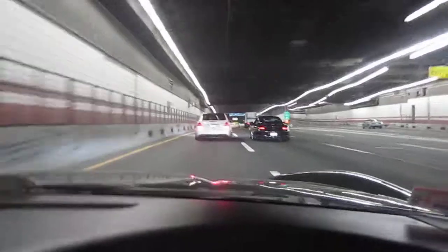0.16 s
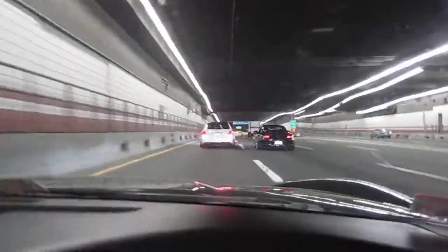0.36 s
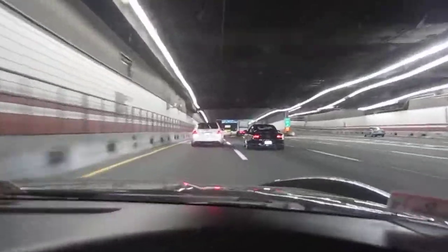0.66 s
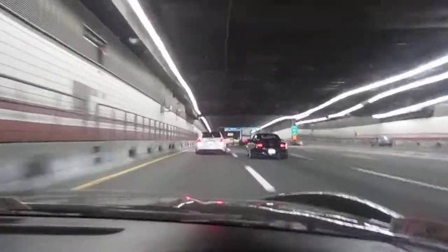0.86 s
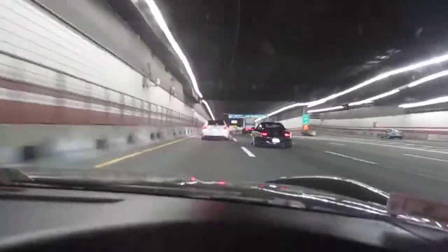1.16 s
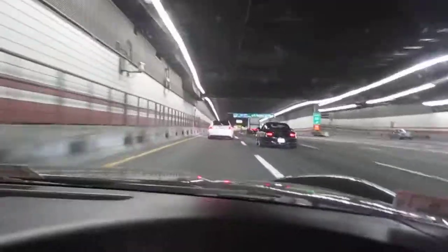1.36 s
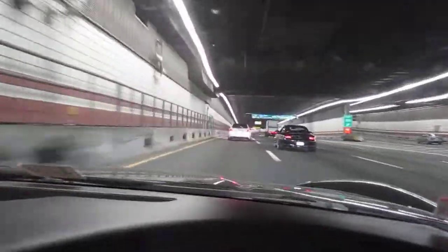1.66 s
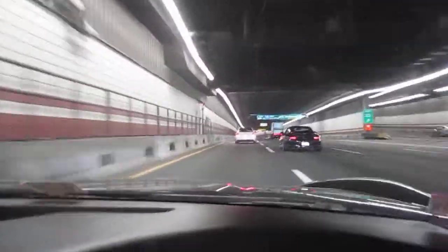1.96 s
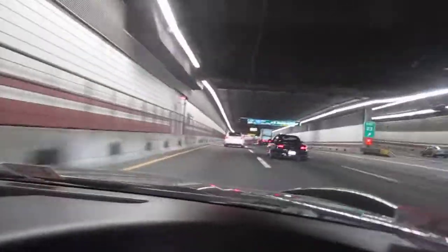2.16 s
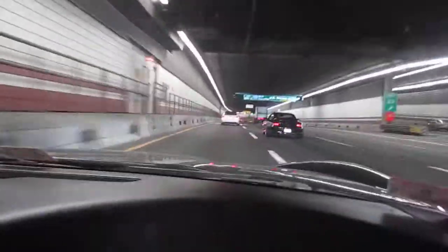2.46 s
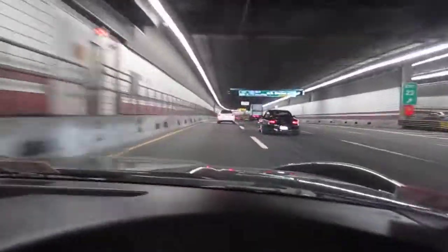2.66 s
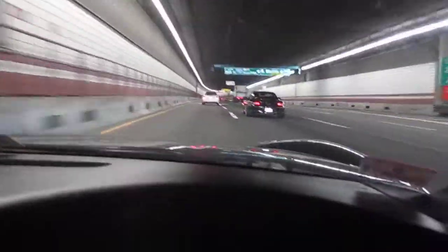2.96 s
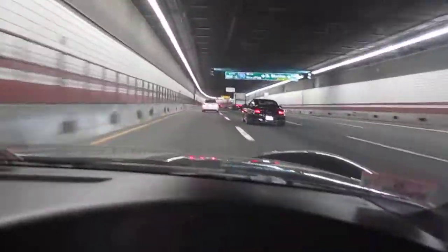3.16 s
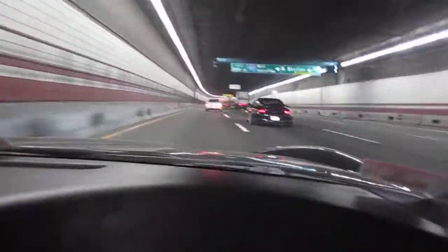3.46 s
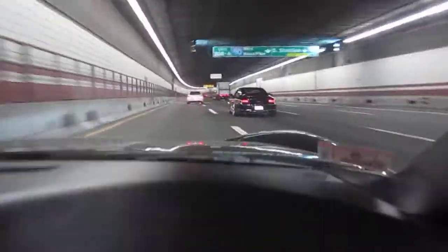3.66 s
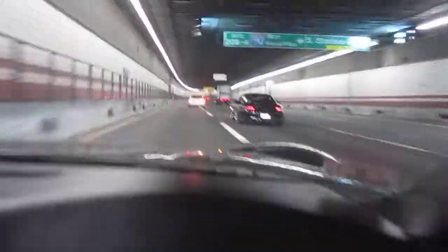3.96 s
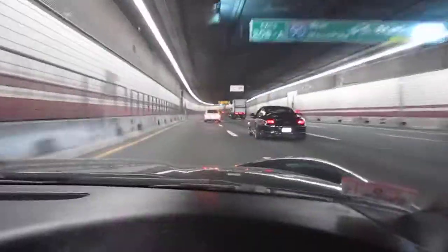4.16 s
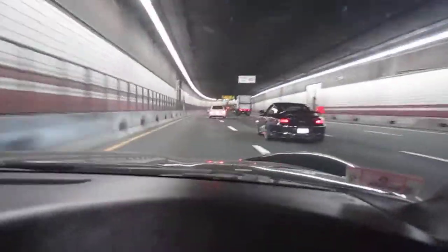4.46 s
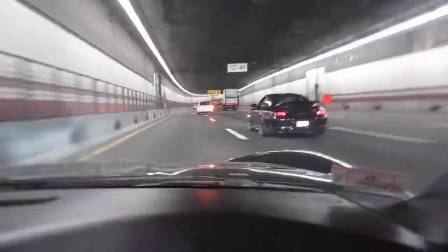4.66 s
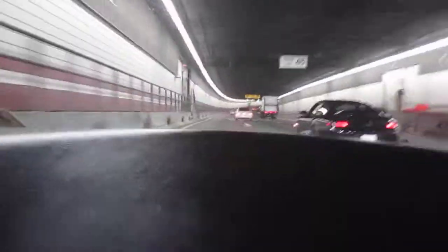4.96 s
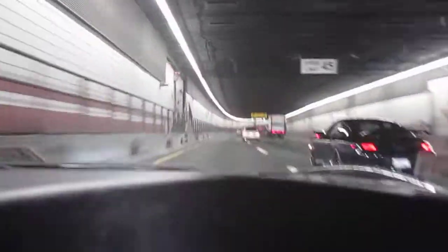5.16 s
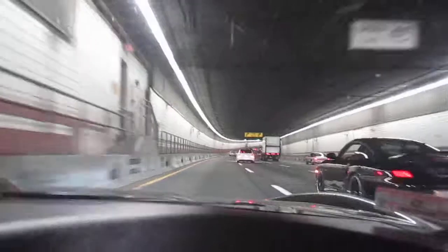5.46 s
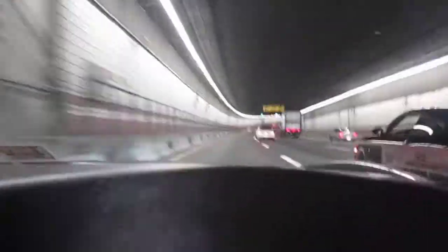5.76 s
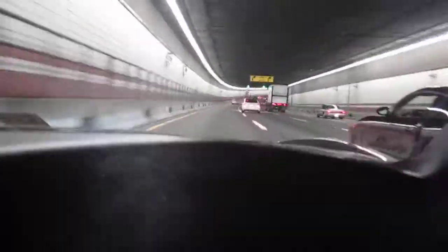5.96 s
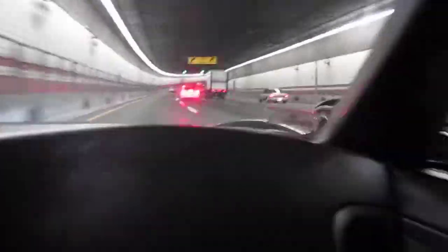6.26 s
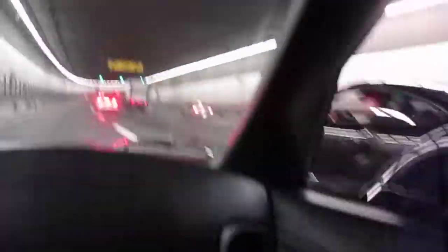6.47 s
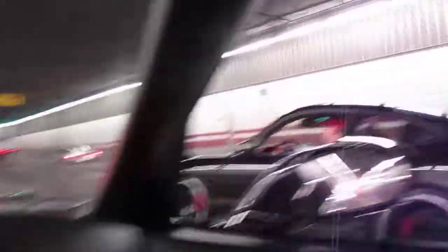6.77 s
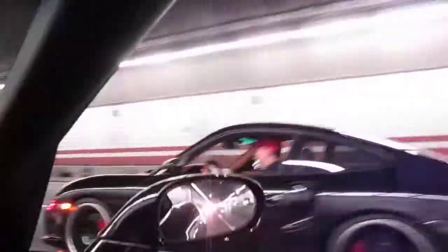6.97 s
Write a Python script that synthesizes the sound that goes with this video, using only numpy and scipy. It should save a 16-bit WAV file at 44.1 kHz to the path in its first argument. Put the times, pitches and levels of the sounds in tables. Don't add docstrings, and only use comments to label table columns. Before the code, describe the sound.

Eight-cylinder growl climbs over roaring tunnel air and tyre hiss, eases into buffeting, then a closing window leaves a dull, ticking cabin.

```python
import sys
import numpy as np
from scipy import signal
from scipy.io import wavfile
from scipy.ndimage import uniform_filter1d

SR = 44100
rng = np.random.default_rng(int(sys.argv[2]) if len(sys.argv) > 2 else 0)


def dump(signal):
    limited = np.clip(np.atleast_2d(signal).T, -1, 1)
    pcm = np.round(limited * 32767).astype(np.int16)
    wavfile.write(sys.argv[1], SR, pcm)


def field_ratio(decibels):
    return 10 ** (np.asarray(decibels, dtype=float) / 20)


N = 313985
SHUT_S, SEAL_S = 6.2, 0.00399

# start_s, cycle_hz
ENGINE_SPEED = [(0.0, 28.71), (1.25, 28.29), (1.5, 28.85), (1.9, 29.26), (2.14, 30.15), (2.7, 32.57),
                (3.0, 33.73), (3.84, 37.74), (4.13, 39.05), (4.56, 40.9), (4.9, 40.09), (5.5, 39.7),
                (6.3, 38.6), (7.12, 38.7)]
# start_s, level_db
FIRING_LEVEL = [(0, -36), (.6, -34.5), (1.15, -29), (2.0, -29.5), (2.6, -27.5), (3.7, -32), (4.0, -35.5),
                (6.2, -47), (6.4, -61), (7.12, -56)]
# multiple, pulling_db, cruising_db, coasting_db
LOUD_ORDERS = [
    (4, -24.5, -42.5, -32),
    (5, -31, -40, -44.5),
    (6, -36.5, -32.5, -43.5),
]
# multiple, full_load_db
LOAD_ORDERS = [(2, -33), (3, -37), (7, -38), (9, -46.5), (10, -40.5), (11, -42), (12, -47.5), (13, -43),
               (14, -42), (20, -45), (21, -45), (22, -59), (24, -48.5)]
# pitch_hz, width_hz, lift_db
BOOM_RINGS = [
    (142.7, 9.6, 6),
    (164.7, 7.4, -8.5),
    (196.7, 6.5, 12.5),
    (235.8, 11, 7.5),
]
# pitch_hz, width_hz, lift_db
PANEL_RINGS = [(61.2, 7.7, 4), (219, 23, 12), (352, 17, 8), (388, 16.5, 9), (810, 78, 6.5)]
PULL_S, PULL_RISE_S, LIFT_S, LIFT_FALL_S = 1.97, 0.28, 4.45, 0.21
CRUISE_LOAD_DB, COAST_LOAD_DB, PULL_SWELL_DB_PER_S, GLASS_LOSS_DB = -14.5, -21.5, 2.5, 5
WALL_BLUR_DB = 0.1116


def engine():
    hz, = in_time(ENGINE_SPEED)
    phase = 2 * np.pi * np.cumsum(hz * (1 + 0.0021 * drift(6.6))) / SR
    pulled, lifted = ramp(PULL_S, PULL_RISE_S), ramp(LIFT_S, LIFT_FALL_S)
    pulling = pulled * (1 - lifted)
    swell_db = pulling * PULL_SWELL_DB_PER_S * (np.arange(N) / SR - 3.4)
    common_db = swell_db - GLASS_LOSS_DB * ramp(SHUT_S, 0.18)
    firing_db, = in_time(FIRING_LEVEL)
    out = tone(8 * phase, firing_db + lift(BOOM_RINGS, 8 * hz), flutter_db=1.5)
    for k, pull_db, cruise_db, coast_db in LOUD_ORDERS:
        db = pulling * pull_db + (1 - pulled) * cruise_db + lifted * coast_db
        wander_db = (0.8 + 2.2 * (1 - pulling)) * drift(4.7)
        db = db + lift(BOOM_RINGS, k * hz) + common_db + wander_db
        out += tone(k * phase, db, flutter_db=1.5)
    load_db = (1 - pulled) * CRUISE_LOAD_DB + lifted * COAST_LOAD_DB + common_db
    for k, full_db in LOAD_ORDERS:
        blur_db = WALL_BLUR_DB * k * drift(5.7)
        db = full_db + load_db + blur_db + lift(PANEL_RINGS, k * hz)
        out += tone(k * phase, db, flutter_db=2.0)
    return out


# start_s, end_s, pitch_hz, glide_hz_per_s, level_db, swell_db_per_s
FAR_EXHAUSTS = [
    (0, 1.1, 135, 4.5, -28.5, 3),
    (1.45, 2.0, 144, 5.5, -33.5, 6.5),
    (0, 1.12, 414, 52, -34, -1.5),
    (0, 1.97, 483, 2, -39, 0),
    (5.5, 6.0, 168.2, -42.5, -30, 3),
]


def far_exhausts():
    out = np.zeros(N)
    for start, end, hz, hz_per_s, db, db_per_s in FAR_EXHAUSTS:
        since = np.arange(N) / SR - start
        heard = ramp(start - .08, 0.027) * (1 - ramp(end, 0.095))
        pitch = np.maximum(hz + hz_per_s * since, .85 * hz) * (1 + 0.0081 * drift(26.2))
        level_db = db + db_per_s * since + 0.69 * drift(5.0)
        out += heard * tone(2 * np.pi * np.cumsum(pitch) / SR, level_db, flutter_db=3.5)
    return out


# pitch_hz, level_db, t60_s
GLASS_RINGS = [
    (240, -12, .04),
    (310, -8, .022),
    (480, -16, .012),
]
# start_s, level_db
KNOCKS = [
    (6.283, -12),
    (6.3035, -13),
    (6.3192, -14),
]
LANDING_S, REBOUND_S = 6.1987, .0017
DOOR_HZ, DOOR_T60_S = 170, .04


def window_thud():
    landing, bumps = np.zeros((2, N))
    landing[round(LANDING_S * SR)] = -.55
    landing[round((LANDING_S + REBOUND_S) * SR)] = .45
    for s, db in KNOCKS:
        bumps[round(s * SR)] = -field_ratio(db)
    landing = signal.lfilter([.15], [1, -.85], landing)
    bumps = signal.lfilter([.15], [1, -.85], bumps)
    bumps = signal.lfilter([.06], [1, -.94], bumps)
    glass = sum(field_ratio(db) * ring(landing, hz, t60) for hz, db, t60 in GLASS_RINGS)
    return ring(bumps, DOOR_HZ, DOOR_T60_S) + glass


BUFFET_HZ, BUFFET_T60_S = 116.7, 0.066
BUFFET_FROM_S, BUFFET_RISE_S, BUFFET_DB = 4.45, 0.13, -28.5


def buffet():
    air = ring(rng.standard_normal(N), BUFFET_HZ, BUFFET_T60_S)
    heard = ramp(BUFFET_FROM_S, BUFFET_RISE_S) * (1 - ramp(SHUT_S, .04))
    return heard * field_ratio(BUFFET_DB + 2.8 * drift(20.0)) * rms_one(air)


# start_s, peak_db, pitch_hz
TICKS = [(6.208, -43, 2979), (6.215, -28.5, 4420), (6.2813, -38, 3160), (6.2854, -40, 3330),
         (6.3054, -47, 3000), (6.3104, -30, 3390), (6.319, -40, 3070), (6.4154, -39, 3000),
         (6.4175, -47, 3320), (6.6114, -24, 4304), (6.7561, -41, 3040), (6.8613, -40, 3288),
         (6.8867, -39, 3077), (7.0509, -48, 5680)]


def ticks():
    out, click = np.zeros(N), np.eye(1, 400)[0]
    snap = signal.sosfilt(signal.butter(3, [1500, 6500], "band", fs=SR, output="sos"), click)
    for s, db, hz in TICKS:
        tick = snap + 0.53 * ring(click, hz, .002) + .012 * ring(click, 9600, .012)
        at = round((s + 0.0011) * SR)
        out[at:at + 400] += field_ratio(db) * tick / np.abs(tick).max()
    return out


# middle_s, spread_s, level_db
RUBS = [
    (6.352, 0.01, -55.5),
    (6.398, 0.012, -57.5),
    (5.735, 0.0054, -41.5),
]
# pitch_hz, width_hz, level_db
RUB_RINGS = [(6395, 1000, 1), (7700, 1200, -5), (9500, 2500, -12)]


def seal_rubs():
    t, white = np.arange(N) / SR, rng.standard_normal(N)
    squeak = sum(field_ratio(db) * rms_one(ring(white, hz, 4.4 / width)) for hz, width, db in RUB_RINGS)
    swells = sum(field_ratio(db) * np.exp(-((t - s) / (1.5 * spread)) ** 2) for s, spread, db in RUBS)
    return rms_one(squeak) * swells


# low_hz, high_hz
SWISH_BAND = [2400, 5530]
SWISH_DB, SWISH_UNTIL_S, SWISH_FADE_DB_PER_S = -43.5, 1.8, 40
TREAD_HZ, TREAD_T60_S, TREAD_DB = 3240, 0.0031, -4


def swish():
    gone_s = np.clip(np.arange(N) / SR - SWISH_UNTIL_S, 0, .45)
    level_db = SWISH_DB - SWISH_FADE_DB_PER_S * gone_s + 0.56 * drift(8.3)
    white = rng.standard_normal(N)
    noise = rms_one(signal.sosfilt(signal.butter(2, SWISH_BAND, "band", fs=SR, output="sos"), white))
    tread = ring(white[::-1], TREAD_HZ, TREAD_T60_S)
    tread = rms_one(ring(tread, TREAD_HZ, TREAD_T60_S))
    return field_ratio(level_db) * (noise + field_ratio(TREAD_DB) * tread)


SQUEEZE_S, SQUEEZE_DB = 0.028, 5


def road(bands, colour, curve, mix, boom_lumps_db, gust_db):
    roar_over_hiss_db, roar_follow, boom_base_db, boom_follow = mix
    hiss_db, = in_time(curve)
    swing_db = hiss_db - np.median(np.array(curve)[:, 1])
    roar_db = hiss_db + roar_over_hiss_db - (1 - roar_follow) * swing_db
    boom_db = boom_base_db + boom_follow * swing_db
    tilt_db = SQUEEZE_DB * np.exp(-np.abs(np.arange(N) / SR - SHUT_S) / SQUEEZE_S)
    gust, lumps = drift(1.7) + 1.17 * drift(40), drift(18.7)
    groups = np.zeros((3, N))
    for hz, band in bands:
        group = int(hz > 380) + int(hz > 1600)
        hiss_sway_db = gust_db * gust + tilt_db * np.log2(hz / 2500)
        sway_db = [boom_lumps_db * lumps, .5 * gust_db * gust, hiss_sway_db]
        groups[group] += band * field_ratio(at_hz(colour, hz) + sway_db[group])
    return [field_ratio(db) * rms_one(g) for db, g in zip((boom_db, roar_db, hiss_db), groups)]


# start_s, level_db
AJAR_HISS = [(0, -36.5), (.5, -39), (1.3, -36.5), (1.75, -37.5), (2.2, -39.5), (3.0, -37), (3.5, -37.5),
             (4.0, -35.5), (4.4, -35.5), (4.65, -37), (5.1, -35), (5.8, -33.5), (6.0, -33), (6.19, -32.5)]
# pitch_hz, density_db_per_hz
AJAR_COLOUR = [(15, -41), (25, -11.5), (53, -2), (91, -17), (148, 0.5), (221, -3.5), (253, -4.5),
               (322, -15.5), (469, -11), (567, -17), (871, -14.5), (5430, -40), (10100, -49),
               (15500, -63.5)]
# roar_over_hiss_db, roar_follow_share, boom_db, boom_follow_share
AJAR_MIX = (8, 0.83, -25, 0.27)


def road_through_gap(bands):
    return sum(road(bands, AJAR_COLOUR, AJAR_HISS, AJAR_MIX, boom_lumps_db=2.0, gust_db=.5))


# start_s, level_db
SHUT_HISS = [(6.2, -43.5), (6.25, -52), (6.32, -52.5), (6.36, -55.5), (6.5, -54), (6.9, -51), (7.12, -49)]
# pitch_hz, density_db_per_hz
SHUT_COLOUR = [(15, -39), (25, -4), (55, -12.5), (110, -1), (173, -5.5), (274, -12.5), (340, -22.5),
               (582, -22.5), (684, -20.5), (871, -23), (1240, -21), (1560, -36.5), (2630, -48), (3300, -52),
               (8130, -71.5), (15500, -86)]
# hum_over_hiss_db, hum_follow_share, boom_db, boom_follow_share
SHUT_MIX = (18.5, 1.2, -30, 0.26)
THROB_FIRST_S, THROB_EVERY_S, THROB_S, THROB_DB, THROB_SPREAD_DB = 6.298, 0.114, 0.034, 8, 1.5
SEATED_S, UNSEATED_DB = 6.33, 3.5


def road_through_glass(bands):
    boom, hum, hiss = road(bands, SHUT_COLOUR, SHUT_HISS, SHUT_MIX, boom_lumps_db=1.0, gust_db=0.6)
    throbs_db = np.zeros(N)
    for k in range(8):
        since = np.arange(N) / SR - THROB_FIRST_S - k * THROB_EVERY_S
        top_db = THROB_DB + THROB_SPREAD_DB * rng.standard_normal()
        throbs_db += top_db * np.exp(-(since / THROB_S) ** 2)
    leak_db = UNSEATED_DB * (1 - ramp(SEATED_S, 0.018))
    return boom * field_ratio(throbs_db) + hum * field_ratio(leak_db) + hiss


def noise_bands():
    edges = 23.75 * 2 ** np.arange(0, 9.5, 1 / 3)
    slope = signal.butter(3, 7500, fs=SR, output="sos")
    white = signal.sosfilt(slope, rng.standard_normal((2, N)))
    bands = []
    for k, (low, high) in enumerate(zip(edges, edges[1:])):
        band = signal.sosfilt(signal.butter(3, [low, high], "band", fs=SR, output="sos"), white[k % 2])
        flicker = field_ratio(0.71 * drift(8.4))
        bands.append((np.sqrt(low * high), np.sqrt(high - low) * rms_one(band) * flicker))
    return bands


def self_noise():
    return field_ratio(-76) * uniform_filter1d(rng.standard_normal(N), size=3)


def rms_one(x):
    return x / np.sqrt(np.mean(x ** 2) + 1e-20)


def in_time(rows):
    s, *columns = np.transpose(rows)
    return [np.interp(np.arange(N) / SR, s, c) for c in columns]


def at_hz(points, hz):
    pitch_hz, db = np.transpose(points)
    return np.interp(np.log(hz), np.log(pitch_hz), db)


def ramp(start, length):
    return np.clip((np.arange(N) / SR - start) / length, 0, 1)


def drift(rate):
    r = np.exp(-80 * np.pi * rate / SR)
    slow = signal.lfilter([1], [1, -2 * r, r * r], rng.standard_normal(N // 40 + 2002))[2000:]
    return np.interp(np.arange(N) / 40, np.arange(len(slow)), rms_one(slow))


def ring(clicks, hz, t60):
    r, w = field_ratio(-60 / (t60 * SR)), 2 * np.pi * hz / SR
    return signal.lfilter([0, np.sin(w)], [1, -2 * r * np.cos(w), r * r], clicks + 1e-18)


def tone(phase, db, flutter_db):
    level = np.sqrt(2) * field_ratio(db + flutter_db * drift(13.2))
    return level * np.sin(phase + rng.uniform(0, 2 * np.pi))


def lift(rings, hz):
    return sum(top_db / (1 + ((hz - mid) / width) ** 2) for mid, width, top_db in rings)


def scene():
    t, bands = np.arange(N) / SR, noise_bands()
    ajar = np.clip((SHUT_S - t) / SEAL_S + .5, 0, 1)
    outside = ajar * (swish() + road_through_gap(bands))
    inside = (1 - ajar) * road_through_glass(bands)
    damped = np.clip(np.abs(t - SHUT_S - .002) / .012, .25, 1)
    drive = damped * (engine() + far_exhausts() + buffet() + outside + inside)
    fade = np.clip((N / SR - t) / .0005, 0, 1)
    return (fade * (drive + window_thud() + ticks() + seal_rubs() + self_noise()))[None]


def roll_off(x):
    return signal.sosfilt(signal.butter(12, 15740, fs=SR, output="sos"), x)


LOW_CUT_HZ, CAPSULE_HZ, OVERLOAD = 195, 22, .36


def record(dry):
    cut, leak = np.exp(-2 * np.pi * np.array([LOW_CUT_HZ, CAPSULE_HZ]) / SR)
    capsule = signal.lfilter([1, -cut], [1, -leak], dry)
    after_shut = np.arange(N) / SR > SHUT_S - .003
    top = OVERLOAD * (1 + 1.6 * after_shut)
    clipped = np.clip(capsule, -top, top)
    thin = signal.lfilter([1, -leak], [1, -cut], clipped)
    thin = signal.sosfilt(signal.butter(8, 15650, fs=SR, output="sos"), thin)
    return roll_off(thin)


dry = scene()
out = record(dry)
dump(out)
```